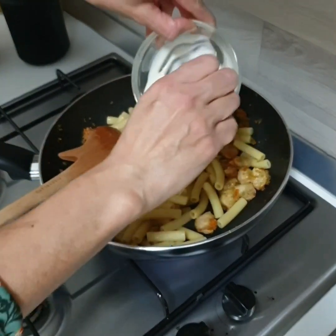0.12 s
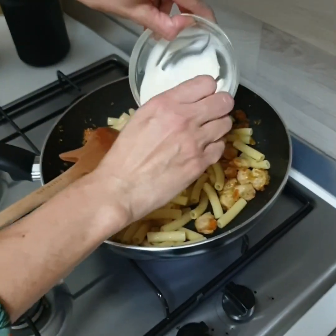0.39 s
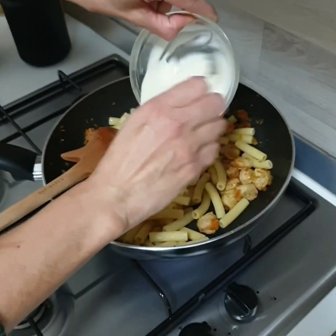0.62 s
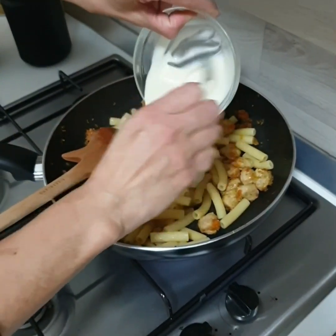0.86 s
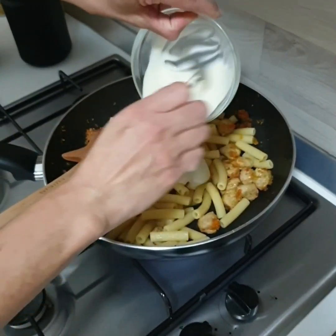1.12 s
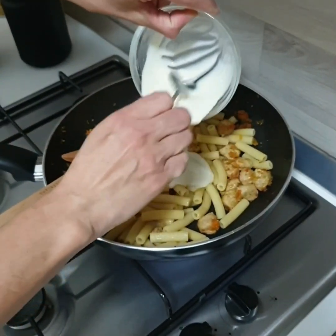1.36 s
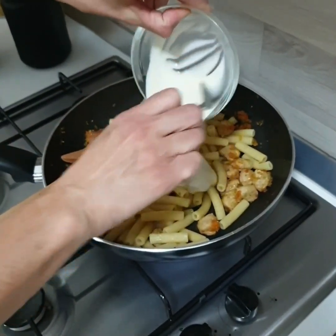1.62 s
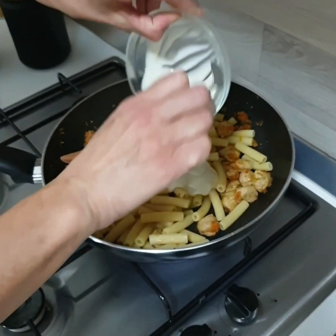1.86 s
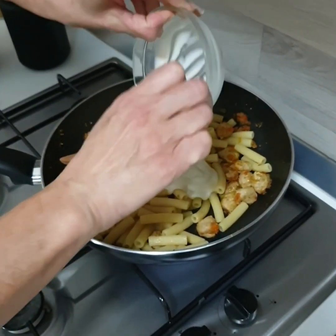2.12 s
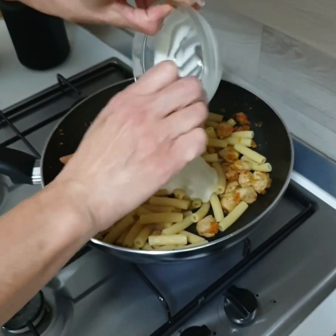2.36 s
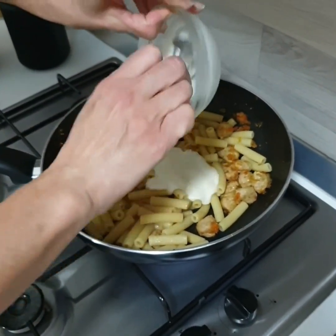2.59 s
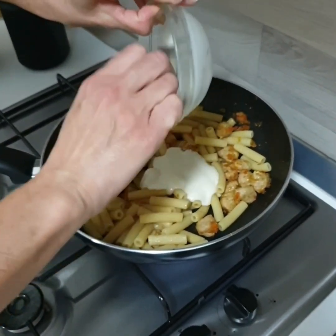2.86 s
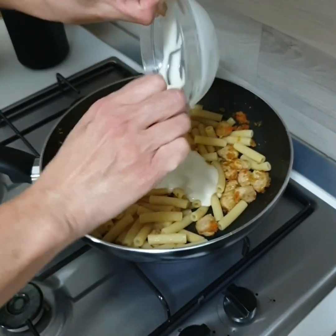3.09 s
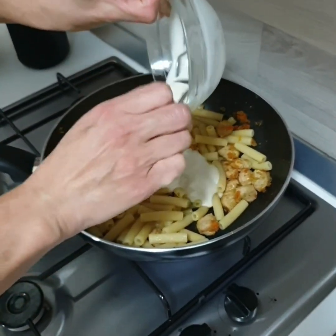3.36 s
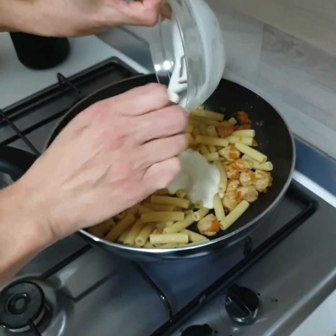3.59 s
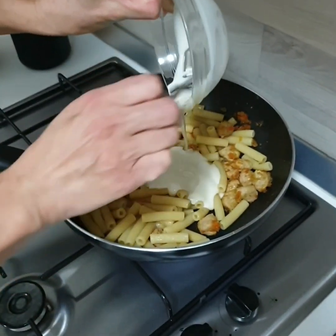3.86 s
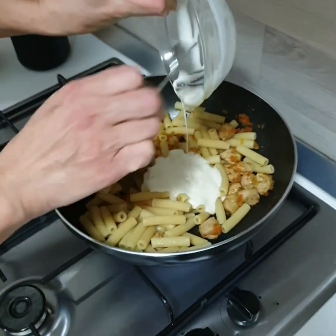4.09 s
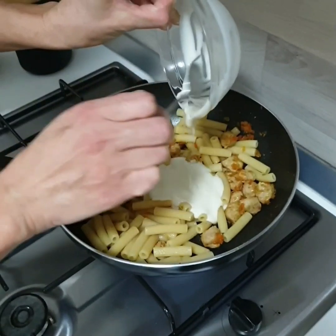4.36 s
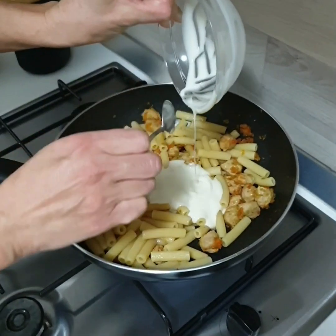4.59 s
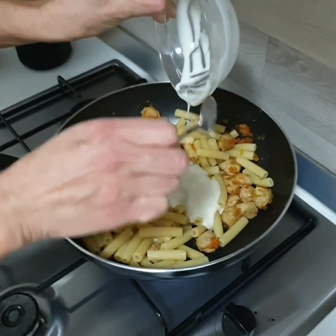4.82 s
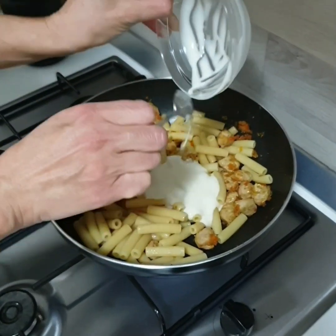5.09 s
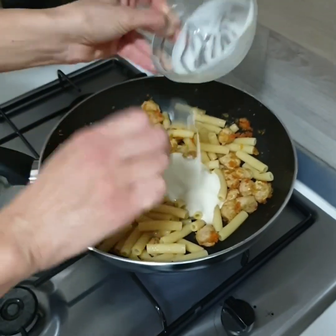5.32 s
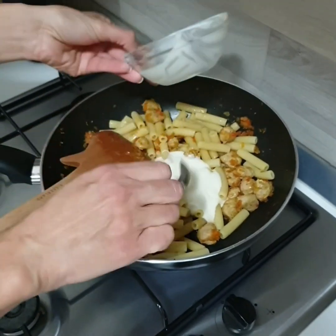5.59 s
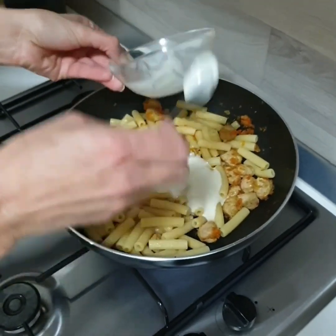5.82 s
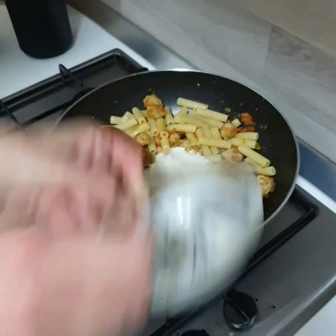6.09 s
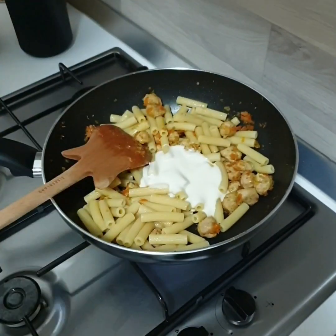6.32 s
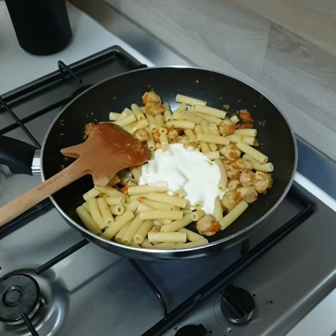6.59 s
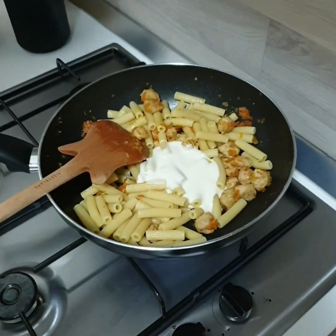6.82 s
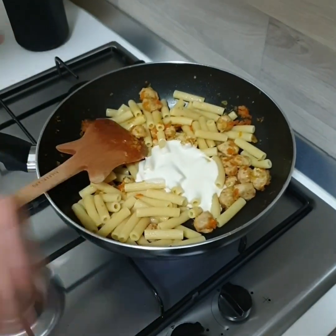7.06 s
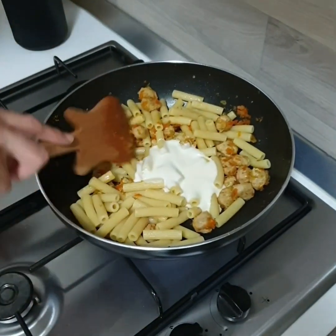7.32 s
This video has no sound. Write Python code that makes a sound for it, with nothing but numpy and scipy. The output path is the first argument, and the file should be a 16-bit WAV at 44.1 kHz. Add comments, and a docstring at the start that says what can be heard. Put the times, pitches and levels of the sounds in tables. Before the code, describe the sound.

A metal spoon taps and scrapes quickly on a small sauce-coated glass bowl, brightening to clinks, then the bowl lands on a counter with a knock.

```python
"""Spoon scraping a glass bowl

A steel spoon scrapes sauce from a small hand-held glass bowl and ticks on it, near a two-port microphone:
bursts of tiny impacts crack, and dying sine waves ring the glass and steel. The bowl is set down with a knock
that rings the counter, the spoon rattles in it, and a hand takes a wooden handle. Shaped noise makes the gas
burner's hiss and the kitchen's rumble; sparse random reflections make the short tail of the hard walls."""
import sys
import numpy as np
from scipy import signal
from scipy.io import wavfile
from scipy.ndimage import uniform_filter1d

SR = 44100
rng = np.random.default_rng(int(sys.argv[2]) if len(sys.argv) > 2 else 0)


def generate_wav(signal):
    """Clip the signal to [-1, 1] and save it as 16-bit WAV at the path in sys.argv[1]."""
    frames = np.transpose(np.atleast_2d(signal))
    scaled = np.clip(frames, -1, 1) * 32767
    pcm = np.round(scaled).astype(np.int16)
    wavfile.write(sys.argv[1], SR, pcm)


def field_ratio(decibels):
    """Amplitude ratio for a level in dB (20 dB per decade); scalars and array-likes work."""
    return 10 ** (np.asarray(decibels, dtype=float) / 20)


N = 328101  # length in samples

# how alike the two ports hear the room and the background: f/Hz, likeness (1 = same, 0 = unrelated)
LIKENESS = [(60, 0.87), (180, 0.97), (550, 0.36), (1650, -0.13), (4970, -0.036), (15000, -0.086)]


def evened(x):
    """Scales to an rms (average strength) of 1."""
    return x / np.sqrt(np.mean(x ** 2) + 1e-20)


def peaked(x, db):
    """Scales to a peak level in dB."""
    return field_ratio(db) * x / abs(x).max()


def read(points, hz):
    """Reads a spectrum between its points, on a log-frequency axis."""
    f, value = np.transpose(points)
    return np.interp(np.log(hz + 1), np.log(f + 1), value)


def along(table, s):
    """Reads every column of a time curve at one moment."""
    when, *columns = np.transpose(table)
    return [np.interp(s, when, column) for column in columns]


def high_pass(x, hz):
    """Takes out the bass: small things radiate little of it."""
    return signal.sosfilt(signal.butter(N=2, Wn=hz, btype="high", fs=SR, output="sos"), x)


def add(mix, at, sound):
    """Adds a sound at a sample index, cut off where the mix ends."""
    part = mix[at:][:len(sound)]
    part += sound[:len(part)]


def place(mix, s, sound):
    """A sound off to one side reaches the two ports at different times and levels; row 2 feeds the room."""
    # path of the sound source: t/s, left port late by/samples, left minus right level/dB
    sideways = [(0, -7.5, 7), (2.5, -6, 5.5), (3.1, 4, 0), (3.7, -1.5, -0.5), (4.2, 12, 7.5), (4.901, 8, 4),
                (6.5, 9, 0)]
    late, pan_db = along(sideways, s)
    for port, sign in enumerate((1, -1, 0)):  # left, right, room feed
        at = round(s * SR + sign * late / 2)
        add(mix[port], at, field_ratio(sign * pan_db / 2) * sound)


def colour(points):
    """A click with the given spectrum, its energy packed as early as possible and scaled to 1."""
    hz = abs(np.fft.fftfreq(2048, 1 / SR))
    log_gain = np.log(field_ratio(np.maximum(read(points, hz), -80)))
    spectrum = np.exp(np.conj(signal.hilbert(log_gain)))  # minimum phase: nothing sounds before the blow
    click = np.fft.ifft(spectrum).real[:1024]
    return click / np.linalg.norm(click)


def ring(modes, scatter_db, size, ratio=1):
    """A struck thing rings in dying sine waves (modes); where the blow lands shifts their balance."""
    t = np.arange(size) / SR
    luck = rng.standard_normal(len(modes))
    total = np.zeros(size)
    for (hz, db, t60), u in zip(modes, luck):
        fade = field_ratio(db + scatter_db * u - 60 * t / t60)  # t60 is the time to fall by 60 dB
        total += fade * np.sin(2 * np.pi * ratio * hz * t)
    return total


def chatter(length_ms):
    """A contact is a quick cluster of tiny impacts that swells and dies."""
    u = np.arange(4000) / SR / (max(length_ms, .3) / 1000)  # time in contact lengths
    impacts = rng.standard_normal(4000) * field_ratio(2.98 * rng.exponential(1, 4000))
    return impacts * u ** 1.69 * np.exp(-2.5 * u)


def background():
    """Random short-time spectra make broad air noise, burner whistles and a wavering rumble."""
    # broad air noise, shape only: f/Hz, level per Hz/dB
    air_shape = [(82, -36), (140, -2), (255, -3.5), (337, -16), (951, -18.5), (1700, -16), (2600, -25.5),
                 (4080, -9.5), (5190, -18), (6460, -9), (7000, -13), (14900, -20), (16500, -30)]
    # whistling ports of the burner: f/Hz, width/Hz, level/dB
    burner = [(1490, 160, -67.5), (1667, 48, -63), (1910, 110, -70), (4170, 22, -69.5), (5570, 43, -76),
              (6400, 45, -65.5), (7400, 150, -78), (8130, 260, -68.5), (9200, 80, -82), (10870, 260, -69),
              (14700, 200, -74)]
    # room hum, relative levels: f/Hz, width/Hz, level/dB
    hum = [(35, 15, -37), (56.3, 13, -3.5), (90, 22, -7.5), (109.1, 12.5, 0)]
    # strength of the whole rumble over time: t/s, level/dB
    rumble_level = [(0.0, -59.5), (0.5, -60), (1.37, -55.5), (1.7, -61.5), (1.9, -51.5), (2.09, -54.5),
                    (2.32, -51.5), (2.8, -59), (3.87, -53.5), (4.12, -56.5), (5.099, -59), (5.45, -67),
                    (5.85, -54.5), (6.0, -67.5), (6.35, -59.5), (7.0, -55), (7.44, -54)]
    air_db = -60
    frames, hz = N // 1024 + 5, np.fft.rfftfreq(4096, 1 / SR)
    a, b, c, d, patches = rng.standard_normal((frames, len(hz), 5)).T

    # the noise swells and sinks in patches, each a small stretch of frequency and time
    patches = uniform_filter1d(patches, 30, axis=0)
    patches = evened(uniform_filter1d(patches, 4, axis=1))
    same = np.clip(read(LIKENESS, hz), -1, 1)[:, None]
    left = a + 1j * b
    right = same * left + np.sqrt(1 - same ** 2) * (c + 1j * d)
    z = np.array([left, right]) * field_ratio(2.5 * patches)

    def peaks(table, order):
        """Power of resonances; a higher order has steeper sides."""
        return sum(field_ratio(2 * db) / w / (1 + (2 * (hz - f) / w) ** order) for f, w, db in table)

    air = field_ratio(2 * read(air_shape, hz))  # doubled dB give power
    rumble = peaks(hum, order=4)
    hiss = field_ratio(2 * air_db) * air / air.mean() + peaks(burner, order=2) * SR / np.pi
    level_db = np.interp((np.arange(frames) - 1) * 1024 / SR, *np.transpose(rumble_level))
    power = hiss[:, None] + (rumble / rumble.mean())[:, None] * field_ratio(2 * level_db)
    white = np.std(signal.istft(z, nperseg=4096, noverlap=3072)[1])  # strength of the uncoloured noise
    noise = signal.istft(z * np.sqrt(power), nperseg=4096, noverlap=3072)[1]
    return noise[:, :N] / white


def spoon():
    """Each contact cracks broadly and rings the damped glass body, the bowl's rim and the spoon."""
    # spoon on glass: t/s, crack peak level/dB, spoon ring level/dB, contact length/ms
    ticks = [(.003, -32, -62, 4.7), (0.1455, -23, -31, 3.6), (0.2487, -25, -57, 6),
             (.4269, -18.5, -30.5, 4.7), (0.5303, -12.5, -49, 3), (0.6821, -12.5, -27.5, 2.8),
             (0.7575, -28, -31.5, 5.2), (.78, -37.5, -46, 8.4), (.955, -43, -70, 51),
             (1.04, -31.5, -37, 14), (1.2044, -11, -24, 3.7), (1.297, -13, -23, 3.5),
             (1.3256, -9.5, -57, 1.16), (1.504, -9.5, -24.5, 4.3), (1.8165, -14, -33, 1.76),
             (2.139, -30, -54, 4.2), (2.2209, -7, -29, 3.4), (2.3846, -8, -16.5, 4.2),
             (2.4647, -5.5, -28, 2.46), (2.6405, -10, -24, 3.17), (2.661, -17, -28, 5.2),
             (2.8824, -9, -35.5, 3.8), (3.1125, -16, -21.5, 3.24), (3.3776, -16.5, -20.5, 1.3),
             (3.4074, -11, -37, 2.16), (3.6391, -12.5, -25, 5.4), (3.908, -10, -29, 2.38),
             (4.177, -4.5, -23, 3.05), (4.4248, -6, -51, 2.7), (4.869, -6, -30, 0.72),
             (6.7844, -11.5, -34, 3.7), (6.799, -24, -48, 5), (6.814, -23, -48, 13), (6.833, -20, -46, 3),
             (6.848, -44, -52, 2.5)]
    # broad crack, shape only: f/Hz, level per Hz/dB
    crack_shape = [(400, -48), (750, -38.5), (1200, -15), (1580, -0.5), (2340, -7.5), (3400, 0),
                   (4430, -8.5), (5510, -0.5), (9130, 0), (9960, -5), (12000, -0.5), (15600, -1),
                   (16000, -27)]
    # sauce-coated glass, relative levels: f/Hz, level/dB, t60/s
    body = [(1033, 2, 0.0078), (1343, -19, 0.019), (3410, -16.5, 0.023)]
    # free rim of the bowl, relative levels: f/Hz, level/dB, t60/s
    rim = [(1560, -22, .03), (3424, -16, 0.05), (3490, -7, 0.025), (4122, -20, 0.04), (5790, -7, 0.025),
           (5949, 0, 0.045), (6350, 5, 0.012), (8910, -1, 0.03), (9020, -6, 0.045), (12140, -12, .03),
           (12450, -8, 0.035), (12570, -8, .07), (15290, -3, 0.04), (15540, -10, .05)]
    # steel spoon, relative levels: f/Hz, level/dB, t60/s
    steel = [(5400, -32, .07), (5800, -46, .08), (9240, 8, 0.036), (11500, -1, 0.032), (13440, 2.5, 0.033),
             (15400, 2, 0.042)]
    # the spoon works from the coated wall out to the free rim: t/s, body re crack/dB, rim re crack/dB
    scraping = [(0, -20, -56), (.7, -24, -18), (1.3, -24, -34), (1.8, -22.5, -31), (2.2, -23, -54),
                (2.45, -17, -33), (3.15, -16, -40), (3.65, -17, -40), (3.9, -24.5, -19.5),
                (4.18, -32.5, -6.5), (4.87, -33.5, -4.5), (6.78, -21.5, -2)]
    # glass and steel rise in pitch as the sauce leaves them: t/s, bowl pitch ratio, spoon pitch ratio
    load = [(0, .97, .91), (.7, .97, .912), (.76, .97, .948), (1.3, .97, .986), (2.4, .975, 1),
            (3.1, .98, 1.013), (3.9, .984, 1.008), (4.4, .99, 1.008), (4.87, 1, 1.008)]
    out, crack, t = np.zeros((3, N)), colour(crack_shape), np.arange(8000) / SR
    for s, crack_db, spoon_db, length_ms in ticks:
        body_db, rim_db = along(scraping, s)
        bowl_ratio, spoon_ratio = along(load, s)
        contact = chatter(length_ms)
        glass = field_ratio(crack_db + rim_db) * ring(rim, scatter_db=0.66, size=8000, ratio=bowl_ratio)
        glass += field_ratio(spoon_db) * ring(steel, scatter_db=1.0, size=8000, ratio=spoon_ratio)
        glass *= 1 - np.exp(-(t / (0.65 * length_ms / 1000)) ** 2)  # builds up while the contact lasts
        add(glass, 0, peaked(signal.fftconvolve(contact, crack), crack_db))
        body_ring = ring(body, scatter_db=5, size=2000)
        add(glass, 0, peaked(signal.fftconvolve(contact, body_ring), crack_db + body_db))
        place(out, s - .0015, glass)  # starts 1.5 ms ahead of the listed time, as a contact first swells
    return high_pass(out, 464)


def kitchen(x):
    """Hard walls send back sparse random echoes: strong early ones, then a tail fading at its own speed per band."""
    # fading time of the tail: f/Hz, t60/s
    tail_t60 = [(200, 0.61), (1000, 0.69), (3000, 0.58), (8000, 0.39), (15000, 0.31)]
    tail_db, early_db, early_t60 = -5.5, -3.5, .06  # dB, dB, s
    # one echo of random sign in every 20 samples, for half a second
    taps = np.zeros((2, SR // 2))
    at = np.arange(120, SR // 2 - 20, 20) + rng.integers(0, 20, (2, (SR // 2 - 121) // 20))
    np.put_along_axis(taps, at, rng.choice([-1., 1.], at.shape), 1)

    # the two ports share their bass more than their treble
    hz, t, z = signal.stft(taps, SR, nperseg=256)
    same = np.clip(read(LIKENESS, hz), -1, 1)[:, None]
    z = np.array([z[0], same * z[0] + np.sqrt(1 - same ** 2) * z[1]])
    response = 0
    for db, t60 in ((tail_db, read(tail_t60, hz)[:, None]), (early_db, early_t60)):
        part = signal.istft(z * field_ratio(-60 * t / t60), SR, nperseg=256)[1]
        response = response + field_ratio(db) * part / np.linalg.norm(part[0])
    return signal.fftconvolve(x[None], response, axes=1)[:, :N]


def counter():
    """Soft blows ring the counter; harder ones reach its upper modes and clatter, unlike at each port."""
    # blows on the counter, the first row a faint rustle: t/s, level/dB, hardness as clatter re blow/dB
    knocks = [(6.531, -73.5, 15.5), (6.629, -25, 2.5), (6.642, -18, -6.5), (6.654, -28.5, -2),
              (6.67, -27, -6), (6.688, -24, -8), (6.719, -28, -4.5), (6.752, -19.5, -15),
              (6.801, -32.5, -24), (6.849, -28.5, -26), (7.17, -52, -5.5), (7.279, -51.5, 3.5),
              (7.31, -41, -7.5)]
    # counter and cupboard, relative levels of a blow of hardness 0: f/Hz, level/dB, t60/s
    counter_modes = [(59, -9, 0.4), (84, -6, 0.25), (97, -7, .3), (110, -5, 0.65), (179.4, -8, 0.19),
                     (245, -7, 0.11), (336, -8, 0.12), (362, -11, 0.11), (470, -12, 0.16), (566, -13, 0.12),
                     (696, -11, 0.21), (794, -20, 0.079), (1066, -17, 0.088), (1240, -28, .05)]
    # broad clatter of each blow, shape only: f/Hz, level per Hz/dB
    slap_shape = [(150, -21.5), (250, -1), (560, -16), (900, -15.5), (3000, -23.5), (15600, -31.5),
                  (16100, -59)]
    out, slap, t = np.zeros((3, N)), colour(slap_shape), np.arange(6000) / SR
    for s, db, hard_db in knocks:
        tilt = 0.3 * hard_db  # dB an octave above 90 Hz
        modes = [(hz, level + tilt * np.log2(hz / 90), t60) for hz, level, t60 in counter_modes]
        place(out, s, field_ratio(db) * ring(modes, scatter_db=1.64, size=30000))
        rattle = rng.standard_normal((3, len(t))) * field_ratio(db + hard_db - 60 * t / 0.12)
        for port in range(3):
            add(out[port], round(s * SR), signal.fftconvolve(rattle[port], slap))
    return high_pass(out, 64)


def handle():
    """A finger on a wooden handle: a very short contact rings a few quickly dying wood modes."""
    # the tap: t/s, peak level/dB
    handle_tap = (7.291, -33)
    # wooden handle, relative levels: f/Hz, level/dB, t60/s
    wood = [(300, -8, .03), (520, -10, .015), (1250, -4, .012), (2000, 0, .015), (2450, -3, .012)]
    out = np.zeros((3, N))
    s, db = handle_tap
    tap = signal.fftconvolve(chatter(0.85), ring(wood, scatter_db=1.0, size=2000))
    place(out, s, peaked(tap, db))
    return high_pass(out, 64)


def scene():
    """Spoon, counter and handle, their room tail from three alternating spots, and the background."""
    near = spoon() + counter() + handle()
    feed = high_pass(near[2], 110)  # below this the counter's own ring carries the boom
    # the hands keep moving, so the reflections keep changing: each spot swells 1.3 times a second
    turn = np.pi * 1.3 * np.arange(N) / SR
    tail = 0
    for spot in range(3):
        share = np.sqrt(2 / 3) * np.cos(turn + spot * np.pi / 3)  # the three powers always add up to 1
        tail = tail + kitchen(feed * share)
    return near[:2] + tail + background()


def low_pass(x):
    """Removes everything above the highest recorded frequency."""
    return signal.sosfilt(signal.butter(12, 16980, fs=SR, output="sos"), x)


def record(dry):
    """Turns the finished mix into the final sound."""
    return low_pass(dry)


dry = scene()
out = record(dry)
generate_wav(out)
```